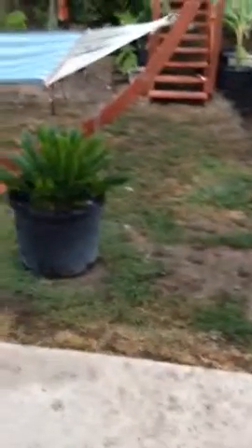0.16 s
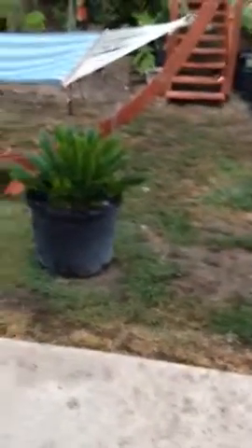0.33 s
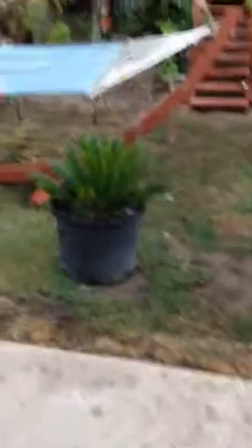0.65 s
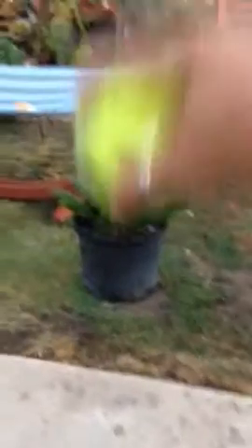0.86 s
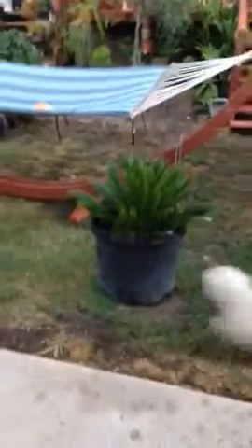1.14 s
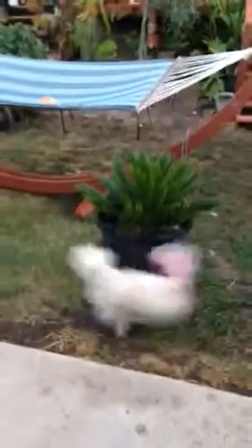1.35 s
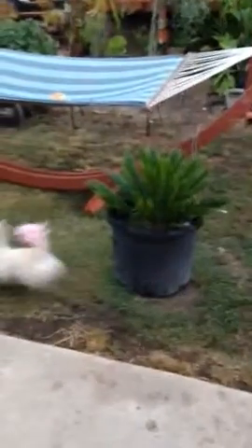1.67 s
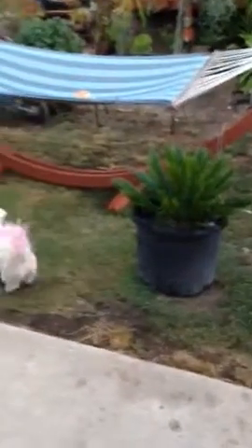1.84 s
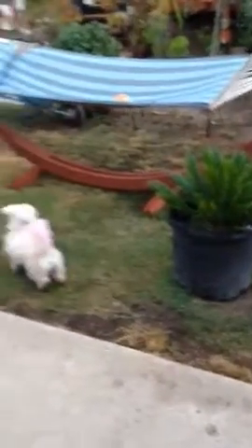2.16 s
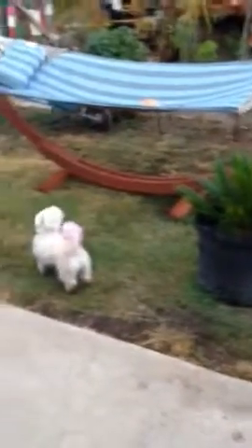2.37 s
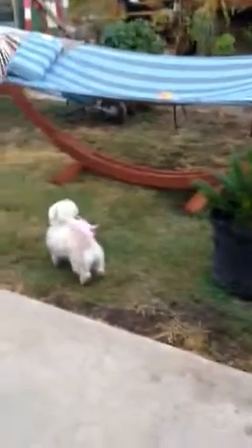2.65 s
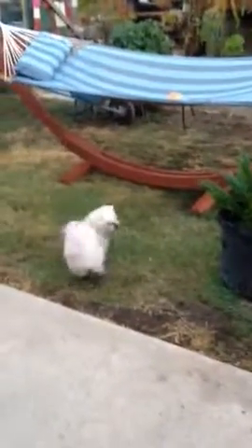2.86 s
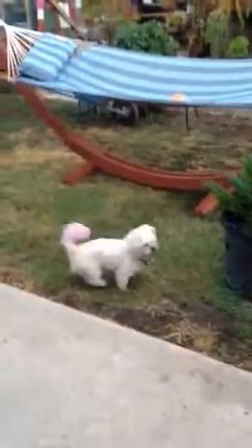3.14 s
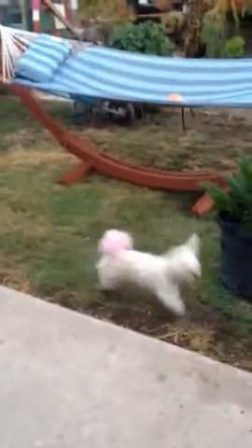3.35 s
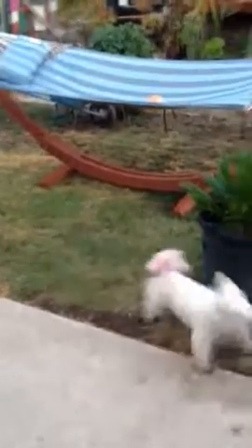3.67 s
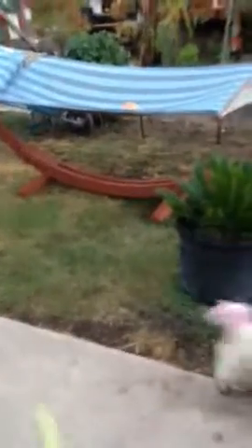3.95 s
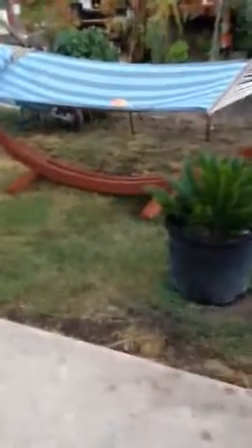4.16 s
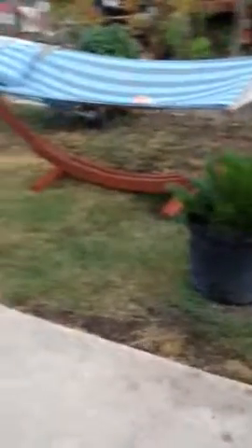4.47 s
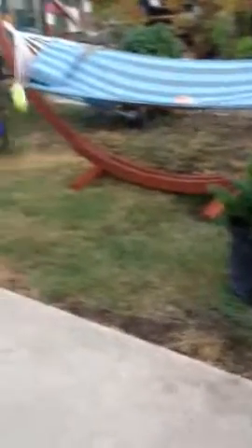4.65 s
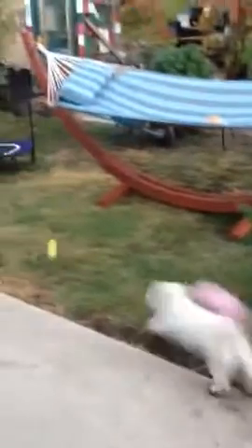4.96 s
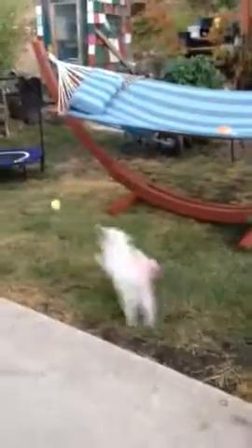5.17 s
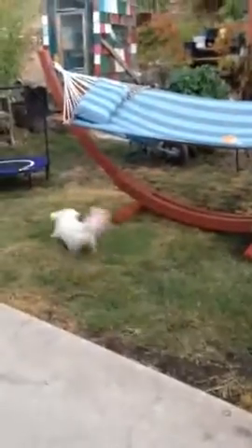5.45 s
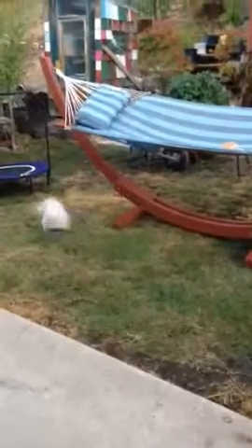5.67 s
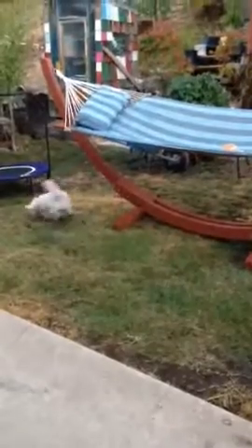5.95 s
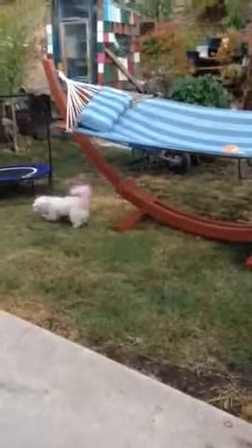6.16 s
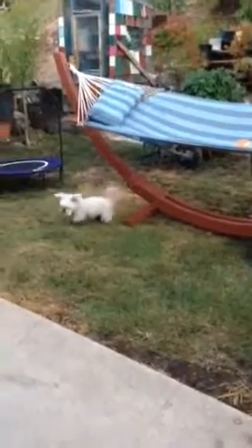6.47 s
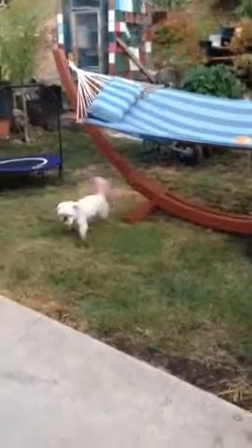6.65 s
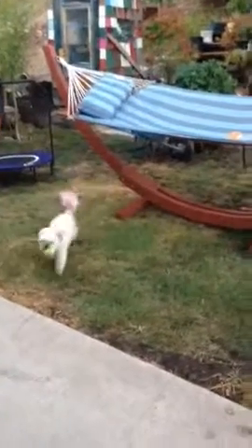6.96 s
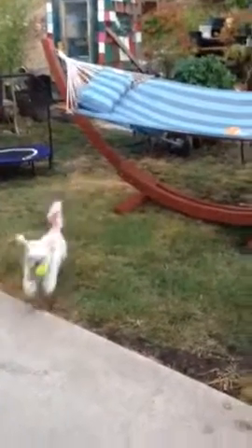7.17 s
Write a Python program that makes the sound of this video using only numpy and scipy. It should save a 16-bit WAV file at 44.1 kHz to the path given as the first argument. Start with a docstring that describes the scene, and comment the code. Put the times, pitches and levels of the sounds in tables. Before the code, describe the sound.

In a quiet backyard, a small dog's collar tags clink as it trots on grass; a ball pocks off concrete, then paws scrabble and thud away.

```python
"""In a quiet back yard, a small dog chases a tennis ball, its collar tags clinking.
The ball slaps the concrete patio once and springs back; thin metal tags knock and ring.
The dog huffs through its muzzle, scrabbles on grit and clicks its claws, then thuds over the lawn.
Light steps swish through the grass. Shaped noise makes the faint rustling and the distant
rumble and hiss; a wavering tone makes the low hum."""
import sys
import numpy as np
from scipy import signal
from scipy.fft import rfft, irfft
from scipy.io import wavfile
from scipy.ndimage import uniform_filter1d

SR = 44100
rng = np.random.default_rng(int(sys.argv[2]) if len(sys.argv) > 2 else 0)


def dump_mix(stems):
    """Bounce the given channels to the path in sys.argv[1] as a 16-bit WAV at rate SR."""
    frames = np.atleast_2d(stems).T  # one column per channel
    limited = np.clip(frames, -1, 1)  # hard clip at full scale
    pcm = np.round(limited * 32767).astype(np.int16)
    wavfile.write(sys.argv[1], SR, pcm)


N = 322371
TIME = np.arange(N) / SR

# Distant rumble and hiss, relative spectrum: [frequency_hz, level_db]
AIR_SPECTRUM = [(15, -70), (25, -38.5), (46, -7.5), (66, 1), (91, -7), (122, -4), (144, -14), (193, -11.5),
                (221, -16), (253, -16), (552, -30), (598, -30), (1490, -37), (5140, -30), (15500, -33)]
AIR_DB = -57.5
HUM_HZ, HUM_DB = 66, -63

# How much the grass is stirred, before the swell factors: [time_s, level_db]
GRASS_STIR = [(0, -68), (.55, -67), (.8, -65), (1.2, -67), (1.8, -67.5), (2.3, -73), (3.1, -71),
              (3.8, -68.5), (4.3, -69), (4.45, -61.5), (5, -66), (5.3, -70.5), (5.55, -64.5), (5.9, -75),
              (6.3, -75), (6.65, -71), (7.3, -72)]
STIR_USUAL_DB = -67
# Crackling blades: [frequency_hz, level_db]
BLADE_SPECTRUM = [(400, -10.5), (850, 0.5), (1200, -2.5), (2100, 0.5), (3000, -4), (5400, -3), (9000, -12),
                  (15000, -14)]
# Dull shuffle under the blades: [frequency_hz, level_db]
SHUFFLE_SPECTRUM = [(50, -13), (120, 1.5), (300, -4.5), (450, -8.5), (700, -16), (2000, -42)]

# Tags knock together; levels are before the shared trims:
# [start_s, clack_db, ring_db, contact_point (0 favours low modes, 1 middle, 2 top)]
TAG_KNOCKS = [(0.051, -52, -47, 2.5), (0.2108, -54, -43, 2.3), (.414, -44, -38, 2.6),
              (.4993, -54, -52, 0.088), (0.626, -38, -47, .5), (.8944, -42.5, -61, 1.5),
              (1.082, -36.5, -46, 1.2), (1.0902, -36.5, -49, 1.8), (1.3799, -36.5, -50, 0.77),
              (1.724, -44, -45, 2.6), (2.039, -50, -48, 2), (2.0751, -40, -41.5, 1.24),
              (2.091, -43, -51, 1.8), (2.836, -39.5, -58, .5), (3.118, -38, -40.5, 2.2),
              (3.4193, -41, -46, 2), (3.43, -38, -28, 2.5), (3.4397, -34, -34, 2), (3.6447, -57, -46, 0),
              (3.6625, -38.5, -41.5, 0), (3.716, -37, -34.5, 2.1), (3.7542, -33, -23.5, 1.68),
              (3.811, -39.5, -37, 2), (4.2746, -42, -33.5, 1.57), (4.335, -34, -32.5, 0.32),
              (4.3839, -29, -46, 0.14), (4.399, -26, -20, 1.3), (4.451, -50, -37.5, 2),
              (4.7524, -31, -27.5, 1.3), (4.9227, -26.5, -23.5, 1.8), (5.094, -35, -35, 1),
              (5.0969, -26, -35, 0.11), (5.392, -50, -51, 1), (6.9525, -44.5, -44.5, 1.5),
              (7.1428, -49, -50.5, 0), (7.184, -39, -49, 1.5)]
# Ringing modes of the tags; t60 is the time to fade by 60 dB, before the choking or shortening:
# [pitch_hz, level_db, t60_s, family (0 low, 1 middle, 2 top)]
TAG_MODES = [(5720, -10, .035, 0), (6090, -1, .065, 0), (8230, -8, .05, 0), (9980, -14, .05, 1),
             (10430, -13, .035, 1), (10860, 0, .08, 1), (13900, -9, .035, 2), (14430, -1, .052, 2)]
# Clack of metal on metal: [frequency_hz, level_db]
CLACK_SPECTRUM = [(1000, -22), (3000, -12), (5500, -2.5), (9500, 5), (12500, -3.5), (15500, -7.5)]
FOCUS_DB = 12.5  # loss per step away from the point of contact
DETUNE = 0.0045  # random pitch scatter, as a share of the pitch
# Tags tremble as the dog trots: [peak_time_s, level_db, swell_and_fade_s]
TAG_JINGLES = [(.26, -60, .05), (.56, -63.5, 0.053), (.88, -61.5, 0.083), (2.085, -56.5, 0.051),
               (2.842, -53.5, 0.036), (3.12, -64, 0.019), (3.438, -48, .018), (3.67, -51.5, 0.019),
               (3.745, -56, .018), (4.52, -52, 0.03), (5.115, -51, 0.028), (7.17, -65.5, 0.044)]

# Runs of light steps through grass: [start_s, end_s, step_level_db, swish_level_db]
STEP_RUNS = [(0.137, .32, -58, -65), (.81, 1.0, -48.5, -65.5), (1.05, 1.25, -53.5, -67.5),
             (5.12, 5.35, -51, -64.5), (5.53, 5.73, -50, -59), (6.68, 7.25, -58, -71)]
STEP_S, STEP_JITTER_S = 0.055, 0.00756  # even pace, and largest shift either way
STEP_HZ, STEP_SPREAD_OCTAVES = 231, 0.59  # middle pitch, and largest shift either way
RUN_FADE_DB, STEP_VARY_DB = 4, 3  # steps get lighter over each run, and no two are alike

# Paws push off on gritty concrete; brightness lifts the treble and lowers the rest:
# [peak_time_s, level_db, rise_s, fall_s, brightness_db]
PAW_SCRAPES = [(.302, -52.5, 0.01, 0.016, -4), (4.063, -52, 0.0092, 0.011, -3.5),
               (4.127, -42, 0.017, 0.019, -3.5), (4.263, -49, 0.023, .008, 0), (4.46, -50, 0.027, 0.096, 0),
               (4.591, -36, 0.014, 0.025, 0), (4.638, -38, .004, .01, 3.5), (4.68, -34, 0.0045, 0.026, 3.5),
               (4.722, -39.5, 0.021, .012, 0.5), (4.778, -48, 0.014, 0.17, 2),
               (4.839, -32, 0.027, 0.019, -1), (4.879, -41, .0096, 0.013, 2), (5.014, -42, 0.013, .01, 0),
               (5.03, -27.5, 0.0071, 0.0041, 0), (5.047, -49, .008, 0.0078, -2)]
# Gritty scraping, also used for crisp grass blades: [frequency_hz, level_db]
GRIT_SPECTRUM = [(240, -17), (400, -14), (738, -17.5), (1560, -6.5), (2470, -5.5), (2790, -6.5),
                 (3160, -2.5), (4090, 0), (5070, 0.5), (5730, 1.5), (8800, 1.5), (13700, -6), (15500, -17)]
SKITTER_DB, SKITTER_S = -33, 0.14  # loose grit rolls on: level against the stroke, and fall time
# Claws click on the concrete: [time_s, level_db]
CLAW_CLICKS = [(0.301, -61), (4.16, -43.5), (4.842, -29), (4.862, -37), (4.89, -35.5), (4.99, -43),
               (5.407, -49.5), (7.258, -54.5)]
CLAW_RISE_S, CLAW_FALL_S = 0.0005, 0.0012

# Heavy landings of paws and ball: [start_s, level_db, pitch_hz]
LANDINGS = [(1.189, -53, 138), (1.355, -46.5, 148), (1.506, -47.5, 160), (4.025, -41, 308),
            (4.444, -45.5, 163), (4.845, -43.5, 167), (4.951, -44, 215), (4.989, -33, 210),
            (5.042, -36.5, 334), (5.405, -45.5, 342), (5.48, -44, 188), (6.258, -53.5, 100)]
# Crushed grass: [frequency_hz, level_db]
TURF_SPECTRUM = [(60, 1), (200, 0), (450, -11.5), (700, -11.5), (1500, -24), (4000, -36), (12000, -40)]

# Short, hollow huffs: [peak_time_s, level_db, swell_and_fade_s, mouth_opening (0 to 1)]
DOG_HUFFS = [(1.729, -52.5, 0.015, 0), (3.785, -59, 0.039, 1), (4.086, -54, 0.023, 0.85),
             (4.125, -48, .019, 0.7)]
# Resonances of the shut muzzle: [frequency_hz, level_db]
MUZZLE_SHUT = [(500, -37), (800, -0.5), (1100, -7), (1500, 1), (1900, -2), (2400, 11), (3000, -24),
               (8000, -16)]
# Resonances of the open muzzle: [frequency_hz, level_db]
MUZZLE_OPEN = [(550, -23), (780, 13), (1100, -3), (1500, 0.5), (2200, 2), (2900, -6), (4500, -2.5),
               (8000, -8.5), (13000, -27)]

# Ball on concrete, before the bass is thinned: [start_s, slap_peak_db, thump_peak_db]
BALL_BOUNCES = [(3.9593, -8, -16.5)]
# Slap of the ball's shell: [frequency_hz, level_db]
SLAP_SPECTRUM = [(100, -20.5), (400, -21), (640, -17), (850, -2.5), (1000, -4.5), (1300, 4), (1550, -0.5),
                 (2200, -4.5), (2650, -14.5), (3200, -6.5), (4600, -22.5), (8000, -36), (15000, -50.5)]
# Nearby walls throw the bounce back: [delay_s, level_db]
WALL_ECHOES = [(.0075, -26), (0.0115, -23.5), (0.0143, -20.5), (0.0169, -28), (0.0194, -24), (.0295, -30)]

# How long the yard's scatter lasts, to a fade of 60 dB: [frequency_hz, t60_s]
YARD_FADE = [(100, 0.39), (400, 0.33), (1500, 0.19), (4000, 0.18), (14000, 0.052)]
EDGE_HZ = 15500  # upper limit of the microphone


def amp(db):
    """Turns decibels into gain."""
    return 10 ** (np.asarray(db) / 20)


def unit(x):
    """Scales to an average strength (rms) of 1."""
    return x / np.sqrt(np.mean(x ** 2) + 1e-20)


def read(points, hz):
    """Reads a table between its points, on a log-frequency axis."""
    table_hz, value = np.transpose(points)
    return np.interp(np.log(hz + 1), np.log(table_hz + 1), value)


def add(mix, s, sound):
    """Mixes a sound in at time s."""
    part = mix[max(round(s * SR), 0):][:len(sound)]
    part += sound[:len(part)]


def colour(x, spectrum):
    """Shapes x by a spectrum, then scales it to rms 1."""
    gain = amp(read(spectrum, np.fft.rfftfreq(len(x), 1 / SR)))
    return unit(irfft(rfft(x) * gain, len(x)))


def drift(per_s):
    """Smooth random wandering of rms 1; a higher rate wanders faster."""
    hz = np.fft.rfftfreq(N, 1 / SR)
    smoothing = np.exp(-(hz / per_s) ** 2)
    return unit(irfft(rfft(rng.standard_normal(N)) * smoothing, N))


def grains(per_s, spread_db):
    """Tiny snaps at random moments; more spread makes a few of them larger."""
    size = amp(spread_db * np.minimum(rng.exponential(1, N), 4))
    happens = rng.random(N) < per_s / SR
    return size * rng.choice([-1, 1], N) * happens


def stroke(s, db, rise, fall):
    """A loudness curve that builds to a peak at time s, then slips away."""
    out = np.zeros(N)
    t = np.arange(-SR // 5, SR // 2) / SR
    curve = np.exp(-np.where(t < 0, (t / rise) ** 2, t / fall))
    add(out, s + t[0], amp(db) * curve)
    return out


def patchy(x, depth_db):
    """Different pitch bands swell and sink on their own."""
    bands = signal.stft(x, nperseg=512, noverlap=384)[2]
    patches = uniform_filter1d(rng.standard_normal(bands.shape), size=6, axis=0)
    patches = unit(uniform_filter1d(patches, size=12, axis=1))
    swollen = bands * amp(depth_db * np.tanh(patches))
    return signal.istft(swollen, nperseg=512, noverlap=384)[1][:N]


def impulse(spectrum, size=4096):
    """The quickest click that has this spectrum and starts at once, at peak 1."""
    hz = abs(np.fft.fftfreq(size, 1 / SR))
    log_gain = np.log(amp(read(spectrum, hz)))
    click = np.fft.ifft(np.exp(np.conj(signal.hilbert(log_gain)))).real
    return click / abs(click).max()


def yard(x):
    """Sparse scatter from fence and furniture, treble dying first."""
    taps = rng.standard_normal(SR // 2) * (rng.random(SR // 2) < 3000 / SR)
    taps[:SR // 200] = 0  # nothing returns in the first 5 ms
    hz, t, bands = signal.stft(taps, SR, nperseg=256)
    fade = amp(-60 * t / read(YARD_FADE, hz)[:, None])
    tail = signal.istft(bands * fade, SR, nperseg=256)[1]
    return signal.oaconvolve(x, tail / np.linalg.norm(tail))[:N]


def air(waver_db=3, wander_rad=0.23):
    """Shaped noise is the distant rumble and hiss; a tone wavering in level and phase is the hum."""
    hum_gain = amp(HUM_DB + waver_db * drift(7.8))
    hum = hum_gain * np.sin(2 * np.pi * HUM_HZ * TIME + wander_rad * drift(4))
    rumble = amp(AIR_DB) * colour(rng.standard_normal(N), AIR_SPECTRUM)
    return rumble + hum


def grass(rustle_db=-1, shuffle_db=-1, rustle_swell=0.78, shuffle_swell=0.76, clump_db=2, patch_db=4):
    """Blades crackle in clumps over a dull shuffle; both swell as the grass is stirred."""
    stir_db = np.interp(TIME, *np.transpose(GRASS_STIR)) - STIR_USUAL_DB
    blades = colour(grains(per_s=2500, spread_db=2.5), BLADE_SPECTRUM)
    blades *= amp(rustle_db + rustle_swell * stir_db + clump_db * np.tanh(drift(25)))
    shuffle = colour(rng.standard_normal(N), SHUFFLE_SPECTRUM)
    shuffle *= amp(shuffle_db + shuffle_swell * stir_db + clump_db * np.tanh(drift(23)))
    return amp(STIR_USUAL_DB) * (patchy(blades, patch_db) + shuffle)


def tags(clack_trim_db=-1, ring_trim_db=2, clack_t60=0.013, chatter_db=-8, chatter_s=0.0032,
         vary_db=3, firm_db=-43, damping=0.071, longest=0.84, reach=1.3, graze_s=0.001, wet_db=-13):
    """Each knock is a hard clack, a chatter of lighter contacts, and the ring of the thin plates."""
    out = np.zeros(N)
    t = np.arange(SR // 5) / SR
    for s, clack_db, ring_db, point in TAG_KNOCKS:
        contact = amp(-60 * t / clack_t60)
        for late in rng.uniform(0.31, 2.2, 2) * chatter_s:
            contact += amp(chatter_db - 120 * abs(t - late) / clack_t60) * (t > late)
        clack = contact * colour(rng.standard_normal(len(t)), CLACK_SPECTRUM)
        clink = amp(clack_db + clack_trim_db) * clack
        # a firm knock presses the plates together and chokes them; a light one lets them sing
        sustain = np.clip(np.exp(damping * (firm_db - ring_db)), 0.2, longest)
        for hz, mode_db, t60, family in TAG_MODES:
            # the point of contact decides how much each mode takes
            away_db = FOCUS_DB * min(abs(family - point), reach)
            chance_db = vary_db * rng.uniform(-0.43, 1)
            level_db = ring_trim_db + ring_db - away_db + mode_db + chance_db
            mode_hz = hz * (1 + DETUNE * rng.standard_normal())
            phase = 2 * np.pi * (mode_hz * t + rng.random())
            clink += amp(level_db - 60 * t / (t60 * sustain)) * np.sin(phase)
        soft_start = 1 - np.exp(-t / (graze_s * sustain))  # light knocks graze and start softly
        add(out, s, clink * soft_start)
    return out + amp(wet_db) * yard(out)


def thud(db, hz, push_s=0.0018, crush_db=-9, crush_t60=0.099):
    """Soft ground does not ring: a low push and a puff of crushed grass."""
    t = np.arange(SR // 8) / SR
    push = t / push_s * np.exp(1 - t / push_s) * np.sin(2 * np.pi * hz * t)
    crush = amp(crush_db - 60 * t / crush_t60) * colour(rng.standard_normal(len(t)), TURF_SPECTRUM)
    return amp(db) * (push + crush)


def patter(swish_rise_s=0.015, swish_fall_s=0.024, body_db=-3, count=12):
    """Paws fall at a nearly even pace; each gives a small thud and sweeps through the blades."""
    out, sweep = np.zeros((2, N))
    for start, end, db, swish_db in STEP_RUNS:
        chances = 2 * rng.random((count, 3)) - 1  # each from -1 to 1
        for k, (shift, pitch, weight) in enumerate(chances):
            s = start + k * STEP_S
            if s >= end:
                break
            force_db = STEP_VARY_DB * weight - RUN_FADE_DB * (s - start) / (end - start)
            step_hz = STEP_HZ * 2 ** (pitch * STEP_SPREAD_OCTAVES)
            landing_s = s + shift * STEP_JITTER_S
            add(out, landing_s, thud(db + force_db, step_hz))
            sweep += stroke(landing_s, swish_db + force_db, swish_rise_s, swish_fall_s)
    crisp = colour(grains(per_s=3500, spread_db=3), GRIT_SPECTRUM)
    dull = colour(grains(per_s=2500, spread_db=3), BLADE_SPECTRUM)
    return out + sweep * unit(crisp + amp(body_db) * dull)


def jingle(ring=0.59):
    """A stream of feather-light contacts keeps the plates ringing, each ring shortened."""
    out = np.zeros(N)
    t = np.arange(SR // 8) / SR
    shaking = sum(stroke(s, db, length, length) for s, db, length in TAG_JINGLES)
    for hz, db, t60, _ in TAG_MODES:
        mode = amp(db - 60 * t / (t60 * ring)) * np.sin(2 * np.pi * hz * t)
        out += signal.oaconvolve(grains(per_s=460, spread_db=4), mode)[:N]
    return shaking * unit(out)


def scrapes(smooth=1.0, split_hz=6000, slip_db=2.5, patch_db=1.3, snap_db=-8, wet_db=-16):
    """Claws and pads catch and slip on countless bits of grit; each stroke has its own brightness."""
    snaps = amp(snap_db) * unit(grains(per_s=70, spread_db=0.5))  # now and then a larger grain
    fine = unit(grains(per_s=5000, spread_db=0))
    grit = colour(fine + smooth * rng.standard_normal(N) + snaps, GRIT_SPECTRUM)
    slipping = amp(slip_db * drift(per_s=570))
    grit = unit(patchy(grit, patch_db) * slipping)
    low_pass = signal.butter(2, split_hz, fs=SR, output="sos")
    coarse = signal.sosfiltfilt(low_pass, grit)
    coarse_power, treble_power = np.zeros((2, N))
    for s, db, rise, fall, bright_db in PAW_SCRAPES:
        skitter = stroke(s, db + SKITTER_DB, rise, SKITTER_S)
        power = stroke(s, db, rise, fall) ** 2 + skitter ** 2
        coarse_power += power / amp(bright_db) ** 2
        treble_power += power * amp(bright_db) ** 2
    out = np.sqrt(coarse_power) * coarse + np.sqrt(treble_power) * (grit - coarse)
    out += grit * sum(stroke(s, db, CLAW_RISE_S, CLAW_FALL_S) for s, db in CLAW_CLICKS)
    return out + amp(wet_db) * yard(out)


def thuds():
    """Heavy landings push the soft ground and crush the grass."""
    out = np.zeros(N)
    for s, db, hz in LANDINGS:
        add(out, s, thud(db, hz))
    return out


def huffs(wet_db=-18):
    """Puffs of air pass through the muzzle; its opening blends the shut and open resonances."""
    out = np.zeros(N)
    for s, db, length, opening in DOG_HUFFS:
        shut = colour(rng.standard_normal(N), MUZZLE_SHUT)
        wide = colour(rng.standard_normal(N), MUZZLE_OPEN)
        breath = unit((1 - opening) * shut + opening * wide)
        out += stroke(s, db, length, length) * breath
    return out + amp(wet_db) * yard(out)


def ball(squash_hz=295, squash_delay_s=0.0018, thin_hz=145, wet_db=-21):
    """The shell slaps the concrete; the ball then squashes and springs back in one swing."""
    squash = -np.sin(2 * np.pi * np.arange(0, 1, squash_hz / SR))
    out = np.zeros(N)
    for s, slap_db, thump_db in BALL_BOUNCES:
        pock = amp(slap_db) * impulse(SLAP_SPECTRUM)
        add(pock, squash_delay_s, amp(thump_db) * squash)
        add(out, s, pock)
        for delay, echo_db in WALL_ECHOES:
            add(out, s + delay, amp(echo_db) * pock)
    high_pass = signal.butter(2, thin_hz, "high", fs=SR, output="sos")
    out = signal.sosfilt(high_pass, out)  # a small ball radiates little bass
    return out + amp(wet_db) * yard(out)


def scene():
    """Everything as heard from the patio."""
    background = air() + grass()
    collar = tags() + jingle()
    dog = patter() + scrapes() + thuds() + huffs()
    return (background + collar + dog + ball())[None]


def record(dry):
    """A small microphone: no deep bass, and a steep limit at the top."""
    high_pass = signal.butter(2, 35, "high", fs=SR, output="sos")
    thin = signal.sosfilt(high_pass, dry)
    band_limit = signal.firwin(301, EDGE_HZ, window=("kaiser", 8), fs=SR)
    return signal.oaconvolve(thin, band_limit[None], "same")


dry = scene()
out = record(dry)
dump_mix(out)
```